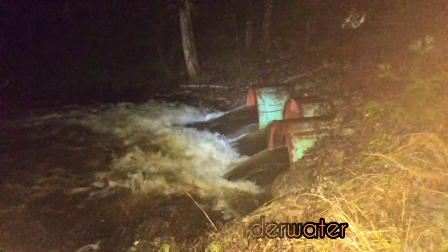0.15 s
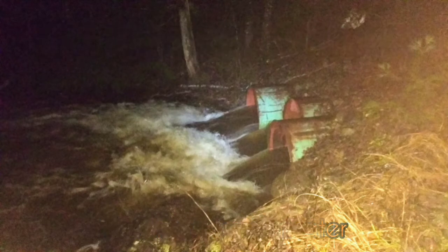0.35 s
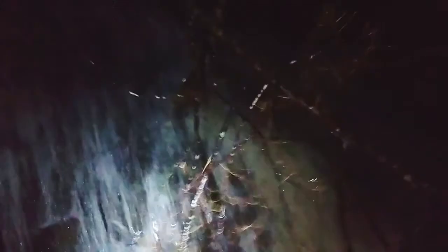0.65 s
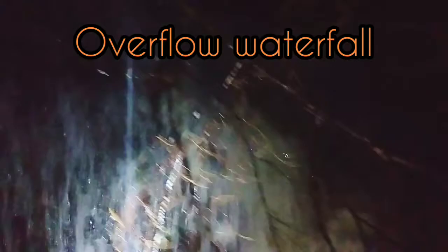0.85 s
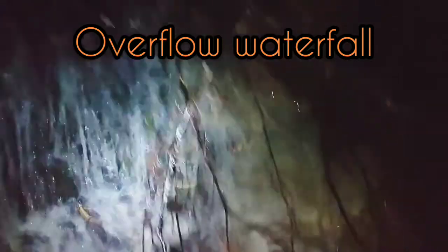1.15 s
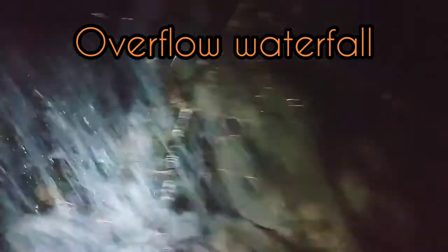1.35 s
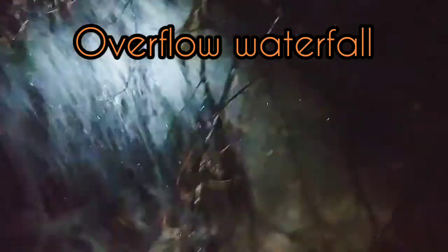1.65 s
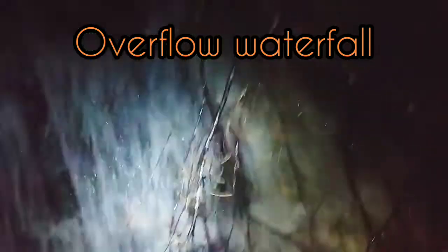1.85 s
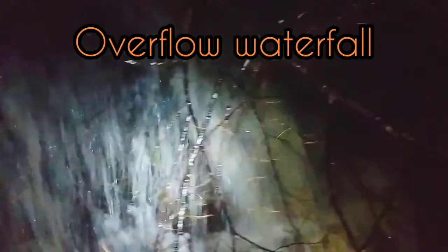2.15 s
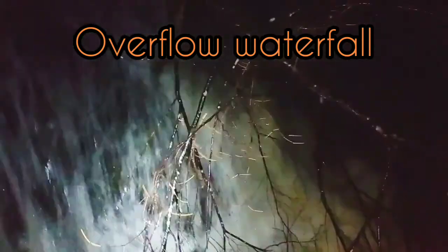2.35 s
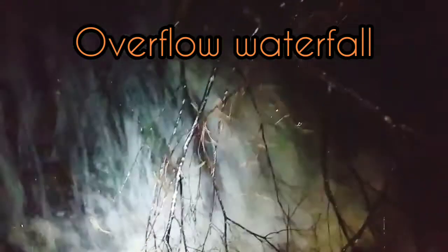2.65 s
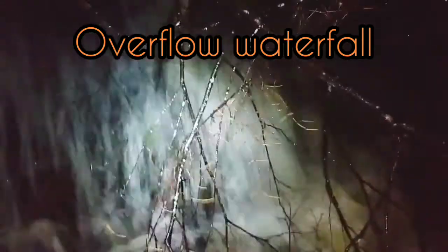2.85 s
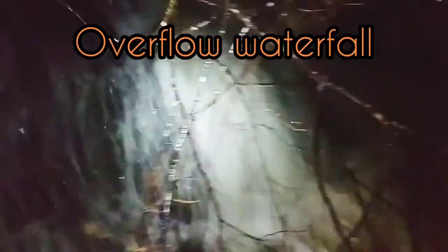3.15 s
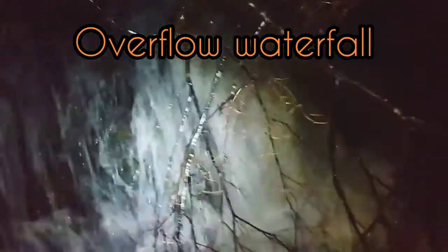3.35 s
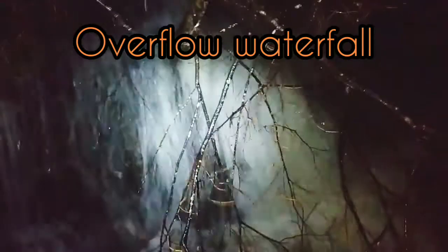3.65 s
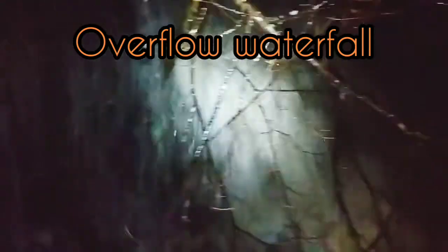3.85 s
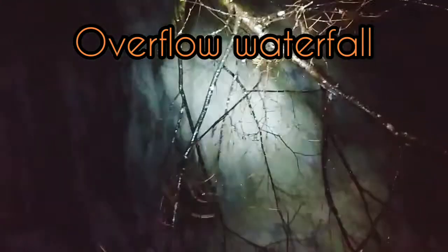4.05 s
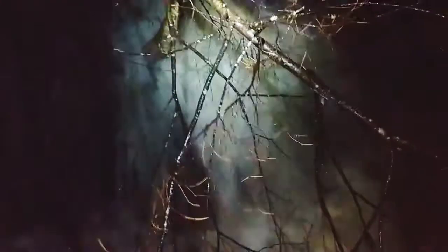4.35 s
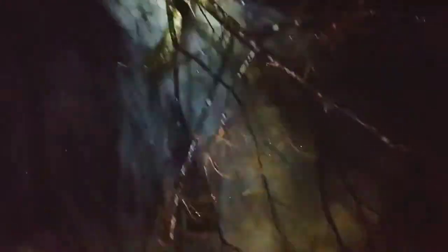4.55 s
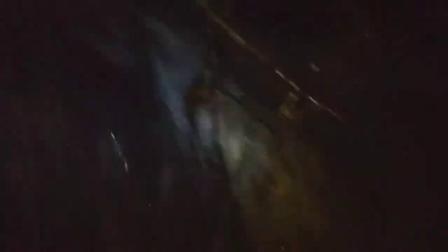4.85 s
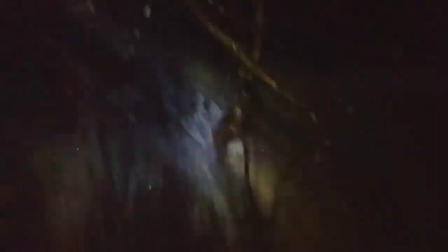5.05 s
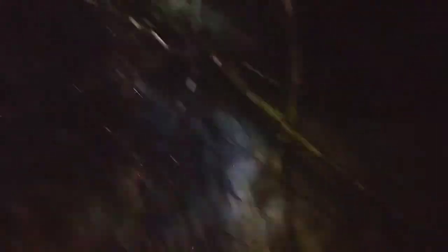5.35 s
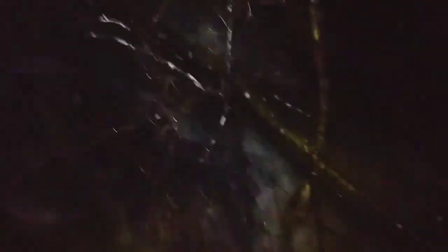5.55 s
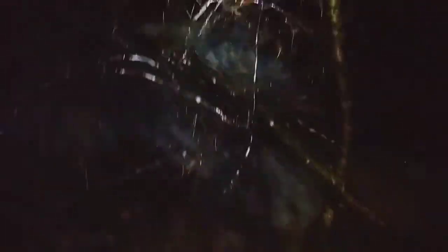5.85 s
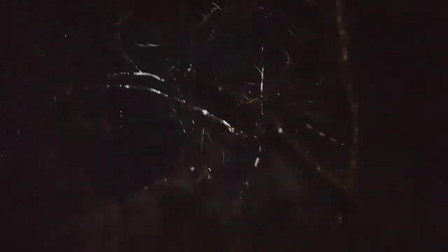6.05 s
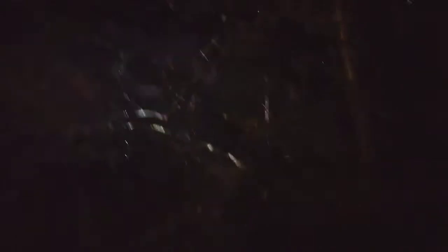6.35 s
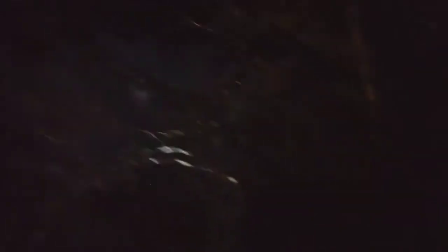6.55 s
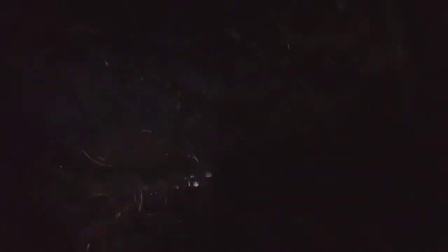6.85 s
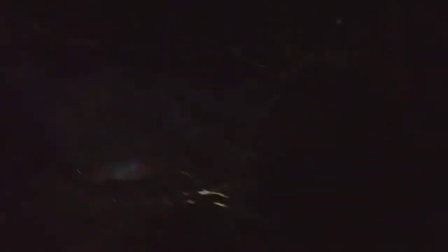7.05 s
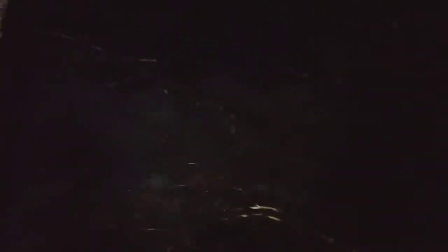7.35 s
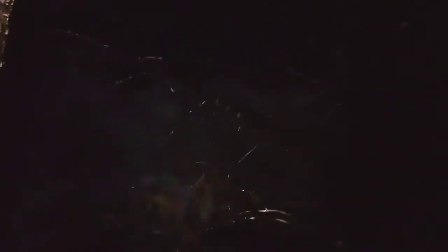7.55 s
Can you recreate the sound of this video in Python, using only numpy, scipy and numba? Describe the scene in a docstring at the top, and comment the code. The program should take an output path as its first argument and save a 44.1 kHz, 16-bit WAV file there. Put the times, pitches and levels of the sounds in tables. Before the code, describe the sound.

Silence for just over half a second, then the roar of a flooded waterfall fades in fast. Dense water pours a few metres away, with low rumble, bright hissing spray, small quick splashes and bubbling froth blended in. It shifts tone briefly near the start as the hand-held phone swings, then stays steady to the end, colouring slowly as the phone turns away. Wide stereo, outdoors at night.

```python
"""A stream bank in flood, where a dense waterfall pours a few metres from a hand-held phone that turns slowly.
Filtered noise makes the roar and hiss, random gain jumps make the splashes, gliding sines make the bubbles.
Two ports hear the fall with their own shading and lag; each side is one port minus a late copy of the other.
Sides carry their own rumble and hiss; all of it fades in after a silent start, under a steep top cut."""
import sys
import numpy as np
from scipy import signal
from scipy.fft import rfft, irfft, next_fast_len
from scipy.io import wavfile
from scipy.ndimage import uniform_filter1d
from numba import njit

SR = 44100
rng = np.random.default_rng(int(sys.argv[2]) if len(sys.argv) > 2 else 0)


def log_audio(samples):
    """Write samples as a 16-bit WAV file to the path given in sys.argv[1]."""
    # one column per channel
    frames = np.atleast_2d(samples).T
    # limit to full scale, then quantise
    limited = np.clip(frames, -1, 1)
    pcm = np.round(limited * 32767).astype(np.int16)
    wavfile.write(sys.argv[1], SR, pcm)


N = 339570
SIZE = next_fast_len(N + 4096)  # padded transform length
FRAME, HOP = 1024, 256  # short-time spectra, samples


def undb(db):
    """Decibels to gain."""
    return 10 ** (np.asarray(db) / 20)


def level(x, db):
    """Scale to an rms level."""
    return x * undb(db) / np.sqrt(np.mean(x ** 2))


def over_hz(table, hz):
    """Columns of a table joined on a log-frequency axis."""
    at, *columns = np.transpose(table)
    return [np.interp(np.log(np.maximum(hz, 1)), np.log(at), c) for c in columns]


def over_s(table, s):
    """Columns of a table joined in time."""
    at, *columns = np.transpose(table)
    return [np.interp(s, at, c) for c in columns]


def colour(x, gain):
    """Fixed filter given as a function of frequency."""
    return irfft(rfft(x, SIZE) * gain(np.fft.rfftfreq(SIZE, 1 / SR)), SIZE)[..., :N]


def dip(hz, centre_hz, width_hz, depth_db):
    """Bell-shaped loss in dB; a negative depth lifts the band."""
    return -depth_db * np.exp(-.5 * ((hz - centre_hz) / width_hz) ** 2)


# Rumble and hiss of each side alone, before the fade and top cut: f/Hz, level/dB per Hz
OWN_NOISE = [(25, -94), (60, -76), (120, -68.5), (300, -79.5), (3000, -100), (6500, -99.5), (11000, -80.5),
             (16000, -80)]


def own_noise(hz):
    """Spectra of independent coloured noise for each side."""
    white = rfft(rng.standard_normal((2, N)), SIZE)
    return white * undb(over_hz(OWN_NOISE, hz)[0]) * np.sqrt(SR / 2)  # unit power per Hz before colouring


# Five ways the phone is held (rows: opening, swung, settled, half turned, turned away):
# lower shadow f/Hz, depth/dB, upper shadow f/Hz, depth/dB, far port lag/ms, far port level/dB,
# ground echo dip/dB, top shadow f/Hz, depth/dB
GRIPS = [(4950, -1, 9300, 8, 0.11, -13, -1, 13500, 7), (6400, 9, 6500, 3.5, .1, -10, 14, 14000, 4),
         (4950, 7.5, 8400, 8, 0.065, -4, 7.5, 11000, 4), (4800, 5.5, 7700, 11.5, 0.19, -6, 5.5, 11300, 0),
         (4480, 3.5, 7820, 10.5, 0.33, -10.5, -0.5, 11000, -2)]
SWING_S, SWING_TAKES_S, SETTLE_S = 0.86, 0.072, 0.19
TURN_FROM_S, TURN_HALF_S, TURN_TO_S = 3.36, 5.4, 6.3


def hold(s):
    """A quick swing of the hand that settles, then a slow turn away; blends the grips over time."""
    opening, swung, settled, half, turned = np.array(GRIPS)[:, :, None]
    swing = np.clip((s - SWING_S) / SWING_TAKES_S, 0, 1)
    since_swing = np.maximum(s - SWING_S - SWING_TAKES_S, 0)
    unsettled = np.exp(-(since_swing / SETTLE_S) ** 2)
    first = np.clip((s - TURN_FROM_S) / (TURN_HALF_S - TURN_FROM_S), 0, 1)
    second = np.clip((s - TURN_HALF_S) / (TURN_TO_S - TURN_HALF_S), 0, 1)
    aim = settled + first * (half - settled) + second * (turned - half)
    after_swing = aim + unsettled * (swung - aim)
    return opening + swing * (after_swing - opening)


# Bell widths of the lower, upper and top shadows: f/Hz
SHADOW_WIDTHS_HZ = (1050, 1090, 770)


def body_shade(hz, low_hz, low_db, high_hz, high_db, top_hz, top_db):
    """Hand and phone body shade three bands that move as the phone turns."""
    low_width, high_width, top_width = SHADOW_WIDTHS_HZ
    shade_db = dip(hz, low_hz, low_width, low_db)
    shade_db = shade_db + dip(hz, high_hz, high_width, high_db)
    return shade_db + dip(hz, top_hz, top_width, top_db)


def ground_echo(hz, depth_db):
    """The echo off the ground cancels a narrow low band, shaped here as a bell in dB."""
    return dip(hz, 383, 30, depth_db)


def churn(shape, frames, bins):
    """Random dB field over frequency and time, smooth over the given patch; spread 1."""
    field = rng.standard_normal(shape)
    for _ in range(2):
        field = uniform_filter1d(field, size=frames, axis=1)
        field = uniform_filter1d(field, size=bins, axis=0)
    return field / field.std()


def turbulence(shape):
    """Wide slow patches and small quick ones raise and lower the spectrum, in dB."""
    wide_slow_db = 0.51 * churn(shape, frames=16, bins=40)
    small_quick_db = 1.22 * churn(shape, frames=3, bins=10)
    return wide_slow_db + small_quick_db


# Low roar against the spray, full in the lows: t/s, level/dB
ROAR = [(.66, -12.5), (.98, -5), (1.03, 1), (1.7, 1), (2.0, -0.5), (2.4, 0.5), (2.8, .5), (3.2, 0.6),
        (3.6, 1.5), (4.0, -0.6), (4.4, 0.5), (4.9, -1), (5.4, -1), (5.9, 0.3), (6.3, 0), (6.8, 0.4),
        (7.3, 1), (7.7, 0)]
ROAR_EDGE_HZ = 2100  # half the dB change is left here


def low_roar(hz, s):
    """The weight of the fall swells and sags as a shelf whose dB change shrinks with frequency."""
    return over_s(ROAR, s)[0] / (1 + (hz / ROAR_EDGE_HZ) ** 2)


# Port pair: f/Hz, likeness of the two ports/0-1, share of the far port's level in dB, share of its lag
PORTS = [(30, .997, 0, .7), (75, 1, -0.16, 0.81), (199, 0.97, -0.016, 0.48), (286, 0.99, 0.27, 0.68),
         (342, 0.72, 0.31, 1.2), (530, 0.8, -0.43, 0.76), (750, 0.53, -0.15, 1.16),
         (1040, 0.77, 0.027, 0.78), (1460, 0, 0.74, 0.81), (2400, 0.07, 0.75, 1.2), (4030, 0, 0.78, 2.1),
         (12000, 0.04, 0.99, 1.05)]


def port_pair(near, apart, hz, gain, far_db, lag_ms):
    """Long waves reach both ports alike, short ones come from different parts of the fall."""
    _, level_share, lag_share = over_hz(PORTS, hz)
    far_gain = undb(level_share * far_db)
    lag = np.exp(-2j * np.pi * hz * lag_share * lag_ms / 1000)
    paths = gain * np.array([near, far_gain * lag * near, far_gain * apart])
    near, shared, apart = signal.istft(paths, SR, nperseg=FRAME, noverlap=FRAME - HOP)[1][:, :N]

    def like(f):
        return np.clip(over_hz(PORTS, f)[0], 0, 1)

    far = colour(shared, like) + colour(apart, lambda f: np.sqrt(1 - like(f) ** 2))
    return np.array([far, near])


@njit
def ring(start, hz, cycles, size, glide, length):
    """Bubbles: decaying sines that rise in pitch."""
    y = np.zeros(length)
    for k in range(len(start)):
        life = int(cycles[k] * SR / hz[k]) + 1
        phase = 0.
        for i in range(min(4 * life, length - start[k])):
            phase += 2 * np.pi * hz[k] * (1 + glide * i / life) / SR
            y[start[k] + i] += size[k] * np.exp(-i / life) * np.sin(phase)
    return y


def bubbles(count, low_hz, high_hz, cycles, spread_db):
    """Air pockets of all sizes trapped under the plunge; even energy per Hz."""
    when, pitch, loud = rng.random((count, 3)).T
    start = (when * N).astype(np.int64)
    hz = low_hz * (high_hz / low_hz) ** pitch
    size = hz * undb(spread_db * loud)
    return level(ring(start, hz, np.full(count, cycles), size, 0.15, N), 0)


def splashes(count, fall_s, depth):
    """Gain that jumps when a slug of water lands and then sinks back."""
    when, loud = rng.random((count, 2)).T
    hits = np.bincount((when * N).astype(int), loud, N)
    keep = np.exp(-1 / (fall_s * SR))
    slugs = signal.lfilter([1], [1, -keep], hits)
    slugs = uniform_filter1d(slugs, size=90)  # soften the landings
    return np.maximum(1 + depth * (slugs - slugs.mean()) / slugs.std(), 0)


def water(slugs):
    """Flat noise for the steady roar, its splashing spray above 1500 Hz, and bubbles."""
    edge = signal.butter(1, 1500, "high", fs=SR, output="sos")
    hiss = rng.standard_normal(N)
    spray = signal.sosfilt(edge, hiss)
    froth = bubbles(count=16000, low_hz=179.9, high_hz=3480, cycles=3.35, spread_db=12.0)
    return hiss + spray * (slugs - 1) + undb(-16.0) * froth


# Tone of the water, before the moving gains: f/Hz, relative level/dB per Hz
WATER = [(25, -22), (50, -18), (75, -6), (130, -1), (220, 2), (300, -1.5), (400, -5), (550, -8.5),
         (800, -9.5), (1200, -10), (1650, -9), (1950, -9), (2200, -8.5), (3100, -10.5), (3700, -9),
         (4500, -10.5), (5000, -10), (5600, -11), (7000, -9), (8300, -11.5), (9300, -13), (11000, -14.5),
         (13500, -11.5), (16000, -10)]


def water_tone(ports):
    """Fixed colour of the fall, the same at both ports."""
    return colour(ports, lambda f: undb(over_hz(WATER, f)[0]))


# Ride of the whole fall, before the output gain and fade: t/s, level/dB
FLOW = [(0.86, -24.5), (1.09, -31.5), (1.24, -32.5), (1.64, -28), (1.68, -30), (2.78, -28), (2.82, -30.5),
        (3.09, -27.5), (3.22, -30.5), (3.54, -28.5), (4.29, -29), (4.4, -33), (4.48, -29.5), (5.2, -28),
        (5.22, -31.5), (5.62, -28), (5.81, -29.5), (5.91, -27.5), (6.44, -29.5), (6.52, -27), (7.01, -29.5),
        (7.59, -28), (7.68, -27.5), (7.7, -27)]


def flow(ports):
    """The flow surges and slackens, moving both ports together."""
    t = np.arange(N) / SR
    return ports * undb(over_s(FLOW, t)[0])


def scene():
    """Sound of the waterfall at the far and near ports."""
    slugs = splashes(count=420, fall_s=0.014, depth=0.068)
    hz, s, near = signal.stft(water(slugs), SR, nperseg=FRAME, noverlap=FRAME - HOP)
    # separate water, same splashes, for what only the far port hears
    apart = signal.stft(water(slugs), SR, nperseg=FRAME, noverlap=FRAME - HOP)[2]
    hz = hz[:, None]
    low_hz, low_db, high_hz, high_db, lag_ms, far_db, ground_db, top_hz, top_db = hold(s)
    shade_db = body_shade(hz, low_hz, low_db, high_hz, high_db, top_hz, top_db)
    shade_db = shade_db + ground_echo(hz, ground_db)
    gain = undb(shade_db + low_roar(hz, s) + turbulence(near.shape))
    ports = port_pair(near, apart, hz, gain, far_db, lag_ms)
    return flow(water_tone(ports))


# Steering delay: f/Hz, delay/ms
STEER = [(2140, .466), (3240, .463), (4400, .456), (15000, .4562)]
# Steering mix: f/Hz, near port taken from left/gain, far port taken from right/gain, right side level/dB
CROSS = [(60, 1, 0.96, -1), (500, 0.85, 0.94, 0), (1210, 0.93, 0.91, -0.3), (1450, 0.9, 0.9, 0.7),
         (1820, 1, 0.99, 2), (2140, 1, 0.99, -1.5), (2600, 1, 0.94, 2.8), (2970, 0.91, 0.69, 0.9),
         (3730, 0.77, 0.77, 1.4), (4460, 1, 0.99, -1.1), (5440, 0.68, 0.79, 0.5), (6600, 0.84, 0.85, 1.5),
         (7700, 0.82, 0.93, 1), (8750, 1, 0.99, -0.3), (9900, 0.69, 0.9, 0.5), (11000, 0.81, 0.99, 1.2),
         (13000, 0.62, 0.99, -0.3), (15000, 0.57, 1, -0.5)]


def steer(far, near, hz):
    """Each side is one port minus the other port delayed, which combs the sum and the difference."""
    late = np.exp(-2j * np.pi * hz * over_hz(STEER, hz)[0] / 1000)
    from_left, from_right, right_db = over_hz(CROSS, hz)
    left = far - from_left * late * near
    right = undb(right_db) * (near - from_right * late * far)
    return np.array([left, right])


GAIN_DB, TOP_HZ = 18, 15730
START_S, FADE_S, FADE_POWER = 0.598, 0.31, 0.49  # the gain rises as (time / fade) to this power


def record(dry):
    """Steered sides plus their own noise, faded in from silence and cut steeply at the top."""
    hz = np.fft.rfftfreq(SIZE, 1 / SR)
    far, near = rfft(dry, SIZE)
    sides = undb(GAIN_DB) * steer(far, near, hz)
    mixed = irfft(sides + own_noise(hz), SIZE)[:, :N]
    fade = np.clip((np.arange(N) / SR - START_S) / FADE_S, 0, 1) ** FADE_POWER
    top_cut = signal.ellip(14, .3, 70, TOP_HZ, fs=SR, output="sos")
    return signal.sosfilt(top_cut, mixed * fade)


dry = scene()
out = record(dry)
log_audio(out)
```